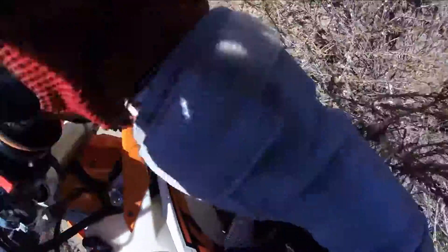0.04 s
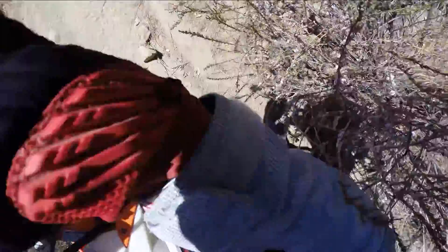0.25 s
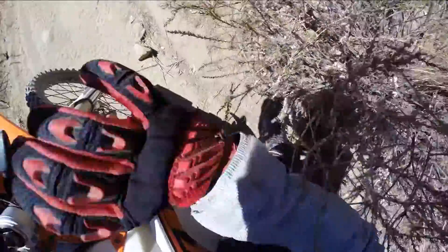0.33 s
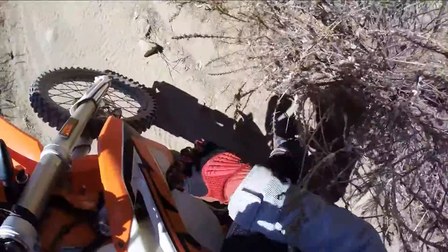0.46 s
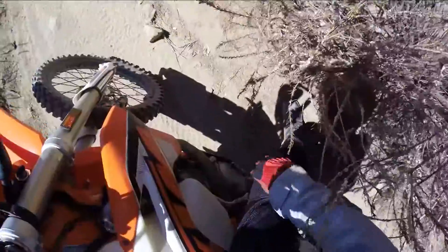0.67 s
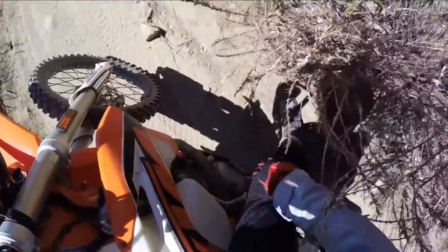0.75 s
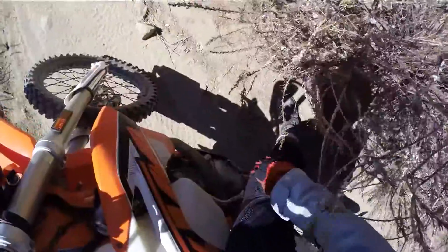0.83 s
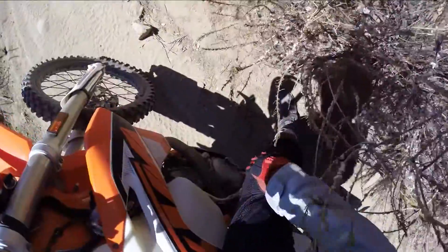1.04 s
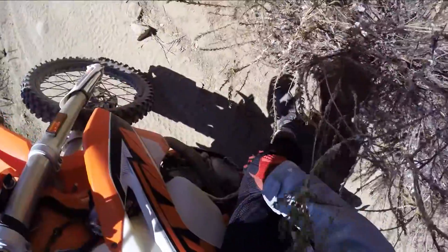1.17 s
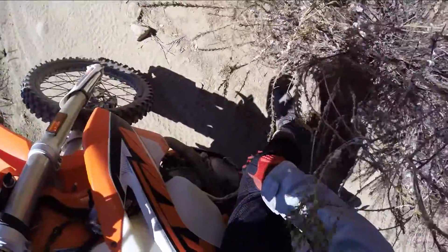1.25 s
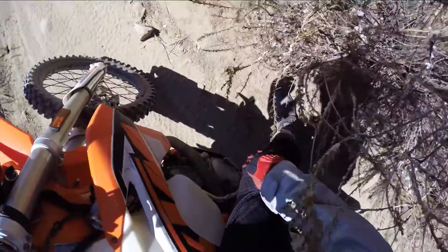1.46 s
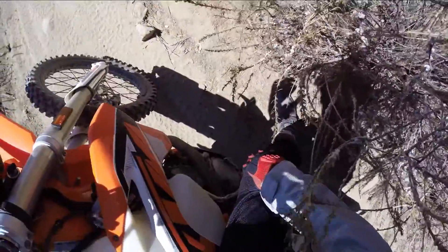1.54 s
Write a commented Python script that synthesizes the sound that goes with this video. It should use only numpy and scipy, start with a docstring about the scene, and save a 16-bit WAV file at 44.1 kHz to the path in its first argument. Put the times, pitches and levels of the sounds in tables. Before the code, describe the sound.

A glove and sleeve scrape and knock against a plastic helmet in one short clatter, ending with a small metal ping. Two soft bumps and faint twig ticks follow in quiet outdoor air, heard from a microphone on the helmet.

```python
"""In quiet scrub, on a stopped dirt bike, a rider's glove and sleeve brush and knock against a helmet.
The helmet carries the microphone. Its plastic shell rattles, a small metal part pings and the
microphone mount wobbles in the bass. Two soft bumps and a few twig ticks follow. The recorder turns
itself down at the clatter, so the background sinks and slowly returns."""
import sys
import numpy as np
from scipy import signal
from scipy.fft import rfft, irfft
from scipy.io import wavfile
from scipy.ndimage import uniform_filter1d

SR = 44100
rng = np.random.default_rng(int(sys.argv[2]) if len(sys.argv) > 2 else 0)


def to_wav(s):
    """Save 16-bit WAV."""
    ch = np.atleast_2d(s).T  # columns
    pcm = np.round(np.clip(ch, -1, 1) * 32767)  # PCM
    wavfile.write(sys.argv[1], SR, pcm.astype(np.int16))


N = 70560
TIME = np.arange(N) / SR


def knocks(shell):
    """Each knock starts with a crack and sets the shell and the visor ringing."""
    # when and how hard each knock lands: start_s, shell_db, visor_db, crack_db
    hits = [(0.1951, -26.5, -27, -45), (0.2195, -8.5, 1, 0.5), (0.2219, -8, 8.5, -11), (0.3040, 7, -6, 4.5),
            (0.318, -4, -21, -8), (0.3228, 0, -18, -16), (0.3409, -2, -3, 0), (0.364, 2, -24, -15)]
    # the visor's own notes: pitch_hz, level_db, fade_s
    visor_notes = [(735, 5, 0.016), (1455, -16.5, .02), (2530, -9.5, 0.011), (2920, -10, 0.017),
                   (3410, -15, 0.011), (3780, -12.5, .012), (8190, -38, 0.0063)]
    # tone of the crack: pitch_hz, level_db
    crack_tone = [(200, -6.5), (700, -1), (1700, 5), (2700, -3), (3300, -14.5), (3900, -13), (4500, -20),
                  (5600, -19), (6800, -28), (9200, -30.5), (10500, -38.5), (15000, -42)]
    on_shell, on_visor, crack = np.zeros(N), np.zeros(N), 0
    for start_s, shell_db, visor_db, crack_db in hits:
        on_shell[int(start_s * SR)] += from_db(shell_db)
        on_visor[int(start_s * SR)] += from_db(visor_db)
        crack = crack + from_db(crack_db) * fade(start_s, fade_s=0.023)
    visor = through(on_visor, 2 * peak_one(ringing(visor_notes)))
    visor = cut_bass(visor, below_hz=560)  # the visor gives off no low notes
    return through(on_shell, peak_one(shell)) + visor + with_tone(crack * rng.standard_normal(N), crack_tone)


def rubbing(shell):
    """The glove catches and slips: tiny clicks shake the shell and add a bright, gritty hiss."""
    # strokes of the glove: start_s, length_s, start_db, end_db, grit_db (relative to the stroke)
    rubs = [(0.1511, .031, -29, -36.5, -9.5), (0.196, 0.044, -30.5, -29.5, -8),
            (0.245, 0.03, -14.5, -5, -11.5), (0.274, .018, -9.5, -9, -13.5), (0.294, .009, -5, -6, -22),
            (0.302, .019, -6, -6, -26), (0.33, .008, -15, -10.5, -14), (0.349, .011, -28.5, -28, -7.5),
            (0.3634, 0.014, -4.5, -6.5, -29.5)]
    # tone of the grit: pitch_hz, level_db
    grit_tone = [(1500, -3.5), (2800, 14.5), (3700, -2), (4400, -13), (5800, 5), (6700, -16.5), (9200, -10),
                 (10000, -19), (13000, -29.5), (15500, -37.5)]
    rise_s, fall_s = 0.0036, 0.0028
    force, grit = 0, 0
    for start_s, length_s, start_db, end_db, grit_db in rubs:
        end_s = start_s + length_s
        stroke = from_db(np.interp(TIME, [start_s, end_s], [start_db, end_db]))
        stroke *= (1 - np.exp(-since(start_s) / rise_s)) * np.exp(-since(end_s) / fall_s)
        force = force + stroke
        grit = grit + stroke * from_db(grit_db)
    shaken_shell = through(force * crackle(), shell / np.linalg.norm(shell))
    return shaken_shell + with_tone(grit * crackle(), grit_tone)


def helmet_shell():
    """The plastic shell answers one click with a dull tap and a few short notes."""
    # the shell's own notes: pitch_hz, level_db, fade_s
    shell_notes = [(335, -2.5, 0.11), (385, -1, 0.046), (462, -2.5, 0.078), (735, 3, .065),
                   (890, -7.5, .055), (1012, -7, 0.06), (1269, 3.5, .055), (1360, 7, 0.061),
                   (1480, -0.5, 0.029), (1856, 1, 0.06), (1870, -6.5, 0.027), (2420, -5, 0.026),
                   (2860, -25, .018), (5510, -29.5, 0.0026)]
    tap_band = signal.butter(3, [150, 1850], "band", fs=SR, output="sos")
    tap = from_db(-6.5) * signal.sosfilt(tap_band, (TIME == 0) + 1e-18)
    return tap + ringing(shell_notes)


def rattle(touches):
    """Loose fittings buzz on briefly after every touch."""
    # tone of the buzz: pitch_hz, level_db
    buzz_tone = [(100, -0.5), (300, -2), (800, -6), (1100, -13.5), (1400, -6.5), (2000, -9), (3000, -27.5),
                 (6000, -54)]
    tail = rng.standard_normal(N) * fade(0, fade_s=0.084)
    buzz = with_tone(through(touches, tail), buzz_tone)
    return from_db(-9.5) * np.std(touches) * level_one(buzz)


def metal_ping():
    """The last knock leaves a small metal part ringing on one note."""
    start_s, pitch_hz = 0.3645, 1856
    return from_db(-11) * fade(start_s, fade_s=0.16) * np.sin(2 * np.pi * pitch_hz * since(start_s))


def mount_wobble():
    """The microphone mount sways as the arm comes up, then soft pushes set it wobbling."""
    # pushes on the mount: start_s, level_db, length_s
    pushes = [(0.154, -33.5, 0.0071), (0.2175, -1, 0.0049), (0.293, -2.5, 0.0093), (0.308, -0.5, 0.0065),
              (0.338, 8.5, 0.017), (0.355, 3, 0.012)]
    # the mount's own low notes: pitch_hz, level_db, fade_s
    mount_notes = [(38.5, -14, 0.69), (56, 10, 0.038), (70.3, -4, 0.2), (124, 2, .17)]
    force = 0
    for start_s, level_db, length_s in pushes:
        push = np.sin(np.pi * np.minimum(since(start_s) / length_s, 1)) ** 2
        force = force + from_db(level_db) * push * 2 / (length_s * SR)
    wobble = sum(from_db(db) * fade(0, fade_s) * sine(hz) for hz, db, fade_s in mount_notes)
    sway_peak_s, sway_width_s = 0.07, 0.06
    sway = from_db(-36.5) * np.exp(-((TIME - sway_peak_s) / sway_width_s) ** 2) * sine(pitch_hz=37.4)
    return through(force, wobble) + sway


def soft_bumps():
    """Each padded bump makes a low thud and a brief scuff."""
    # bumps after the clatter: start_s, thud_db, scuff_db
    bumps = [(0.4795, -22.5, -35.5), (0.997, -26, -54)]
    # low notes that a bump sets ringing: pitch_hz, level_db, fade_s
    thud_notes = [(70.53, 4.5, .24), (117.2, -5.5, 0.2), (157.7, -27.5, 0.018)]
    # tone of the scuff: pitch_hz, level_db
    scuff_tone = [(100, 5), (300, 10.5), (800, 0), (1400, 4.5), (2600, -8.5), (4000, -32), (12000, -53)]
    clicks, scuff = np.zeros(N), 0
    for start_s, thud_db, scuff_db in bumps:
        clicks[int(start_s * SR)] += from_db(thud_db)
        scuff = scuff + from_db(scuff_db) * fade(start_s, fade_s=0.036)
    thud = sum(from_db(db) / fade_s * fade(0, fade_s) * sine(hz) for hz, db, fade_s in thud_notes)
    thud *= 1 - np.exp(-TIME / 0.0022)  # soften the start
    return through(clicks, peak_one(thud)) + with_tone(scuff * rng.standard_normal(N), scuff_tone)


def twigs():
    """Twigs tick in tiny bursts of dry crackle."""
    # light ticks: start_s, level_db
    ticks = [(0.424, -51.5), (0.587, -56.5), (0.757, -51), (0.771, -60)]
    # tone of a twig: pitch_hz, level_db
    twig_tone = [(1000, -3), (3000, -2.5), (7000, -7), (14000, -14)]
    bursts = sum(from_db(level_db) * fade(start_s, fade_s=0.027) for start_s, level_db in ticks)
    return with_tone(crackle() * bursts, twig_tone)


def background():
    """Still outdoor air and the faint, pulsing whine of the electronics."""
    # tone of the air: pitch_hz, level_db
    air_tone = [(25, 2.5), (45, 4), (75, 2), (125, -6.5), (313, -12.5), (900, -19), (1300, -17),
                (1700, -22.5), (3000, -24.5), (6000, -32), (10000, -39.5), (12000, -44), (15500, -59)]
    pulsing = sine(23.8) < 0  # on half the time
    whine = from_db(-75) * pulsing * sine(pitch_hz=10710)
    return from_db(-52.5) * with_tone(rng.standard_normal(N), air_tone) + whine


def crackle(clicks_per_s=2500, spread_db=5, hiss=0.3):
    """Tiny friction clicks of uneven size over a smooth hiss."""
    sizes = from_db(spread_db * np.minimum(rng.exponential(1, N), 4)) * rng.choice([-1, 1], N)
    clicks = sizes * (rng.random(N) < clicks_per_s / SR)
    return level_one(level_one(clicks) + hiss * rng.standard_normal(N))


def ringing(notes):
    """Fading notes after one click. Longer ones start softer; neighbours swing opposite ways."""
    return sum((-1) ** k * from_db(db) * 2 * np.log(1000) / (fade_s * SR) * fade(0, fade_s) * sine(hz)
               for k, (hz, db, fade_s) in enumerate(notes))


def with_tone(sound, tone):
    """Make some pitches stronger and others weaker; plain hiss keeps its overall level."""
    pitch_hz, level_db = np.transpose(tone)
    all_hz = np.maximum(np.arange(N // 2 + 1) * SR / N, 1)
    gains = from_db(np.interp(np.log(all_hz), np.log(pitch_hz), level_db))
    return irfft(rfft(sound) * level_one(gains), N)


def cut_bass(sound, below_hz):
    """Weaken the low pitches."""
    return signal.sosfilt(signal.butter(2, below_hz, "high", fs=SR, output="sos"), sound)


def through(force, answer):
    """The sound of a shaken object, given its answer to one click."""
    return signal.fftconvolve(force, answer)[:N]


def fade(start_s, fade_s):
    """Jump to 1 at start_s, then fall by 60 dB every fade_s."""
    return (TIME >= start_s) * np.exp(-np.minimum(np.log(1000) * since(start_s) / fade_s, 50))


def since(start_s):
    """Seconds since a moment, zero before it."""
    return np.maximum(TIME - start_s, 0)


def sine(pitch_hz):
    """A steady, pure note."""
    return np.sin(2 * np.pi * pitch_hz * TIME)


def from_db(db):
    """Turn decibels into a number to multiply by."""
    return 10 ** (np.asarray(db) / 20)


def level_one(sound):
    """Scale the average (rms) level to 1."""
    return sound / np.sqrt(np.mean(sound ** 2) + 1e-20)


def peak_one(sound):
    """Scale the biggest swing to 1."""
    return sound / np.abs(sound).max()


def scene():
    """All sources meet at one microphone, which loses the deepest bass."""
    shell = helmet_shell()
    touches = rubbing(shell) + knocks(shell)
    helmet = touches + rattle(touches) + metal_ping() + mount_wobble() + soft_bumps()
    return cut_bass(helmet + twigs() + background(), below_hz=22)[None]


def record(dry):
    """The recorder turns down fast when it gets loud, recovers slowly, rounds peaks and cuts top treble."""
    limit_db, recovery_db_per_s = -5.5, 17.5
    average_s, look_ahead_s, react_s = 0.0035, 0.0015, 0.00052
    power = uniform_filter1d(dry[0] ** 2, int(average_s * SR))
    over_db = np.maximum(10 * np.log10(np.maximum(power, 1e-12)) - limit_db, 0)
    recovery_db = recovery_db_per_s * TIME
    dip_db = np.maximum.accumulate(over_db + recovery_db) - recovery_db
    dip_db = np.interp(TIME + look_ahead_s, TIME, dip_db)
    smoothing = np.exp(-1 / (react_s * SR))
    turned_down = dry * from_db(-signal.lfilter([1 - smoothing], [1, -smoothing], dip_db))
    rounded = turned_down / (1 + turned_down ** 8) ** (1 / 8)
    return signal.sosfilt(signal.cheby2(12, 70, 16000, fs=SR, output="sos"), rounded)


dry = scene()
out = record(dry)
to_wav(out)
```